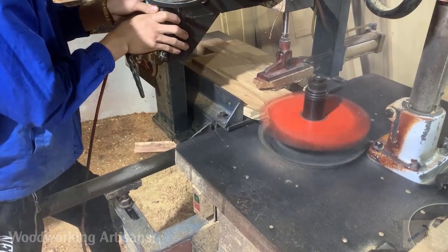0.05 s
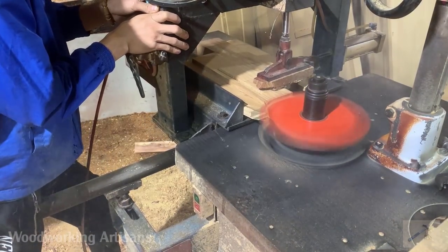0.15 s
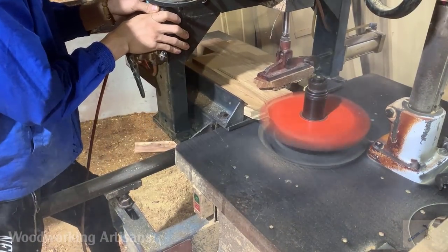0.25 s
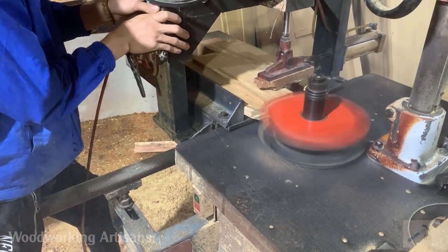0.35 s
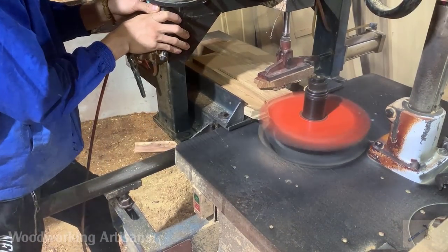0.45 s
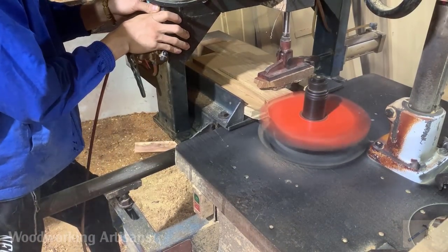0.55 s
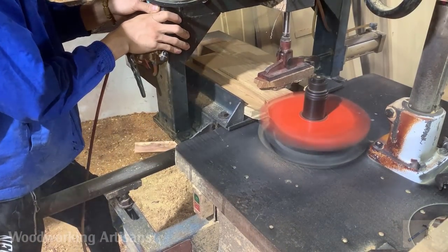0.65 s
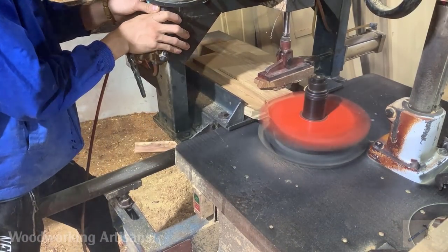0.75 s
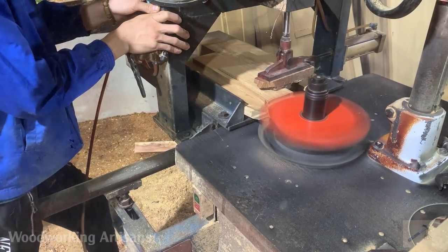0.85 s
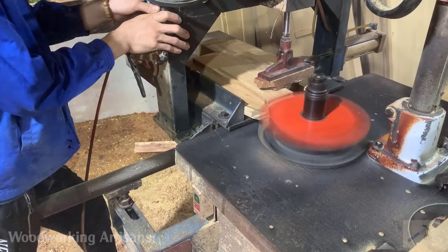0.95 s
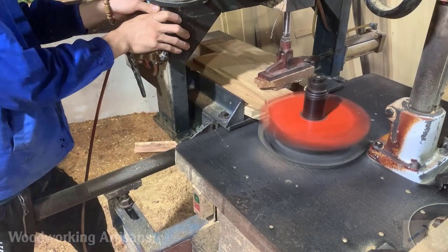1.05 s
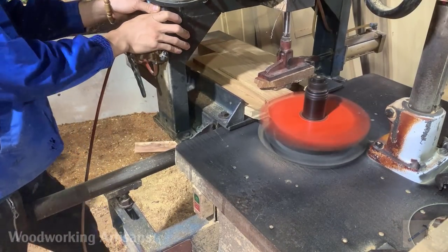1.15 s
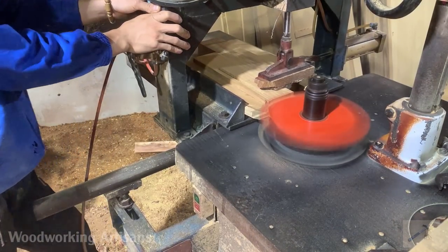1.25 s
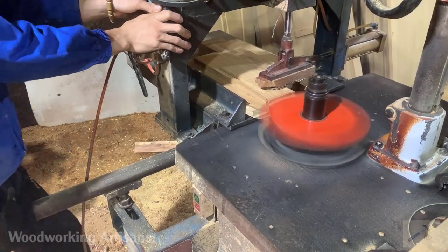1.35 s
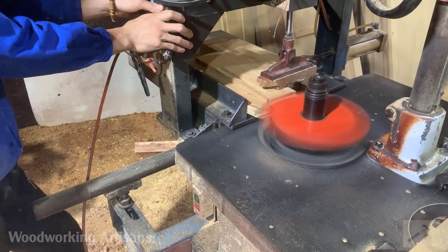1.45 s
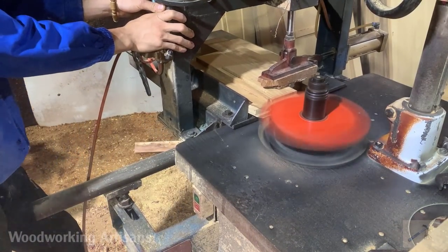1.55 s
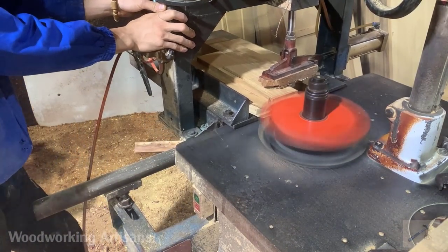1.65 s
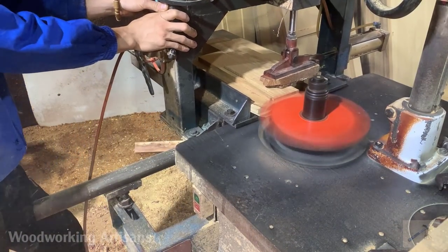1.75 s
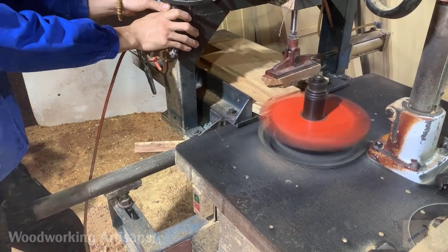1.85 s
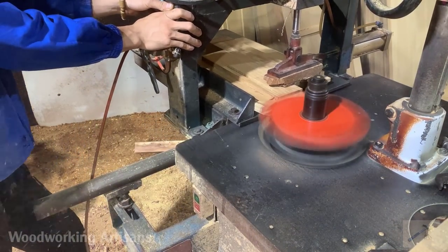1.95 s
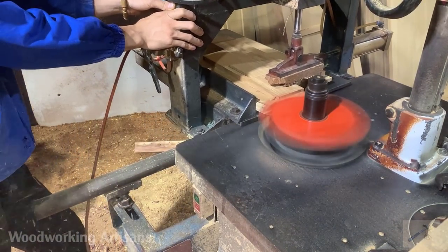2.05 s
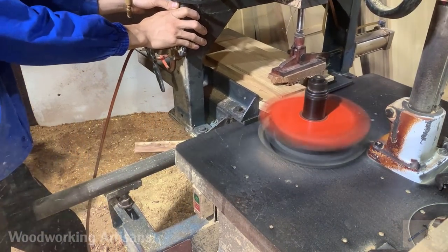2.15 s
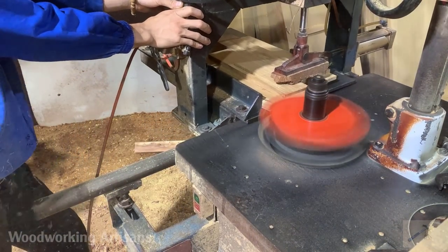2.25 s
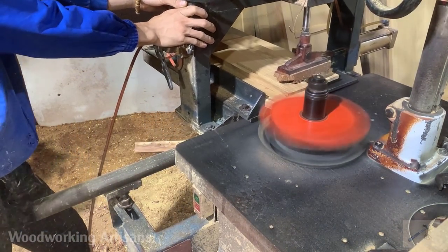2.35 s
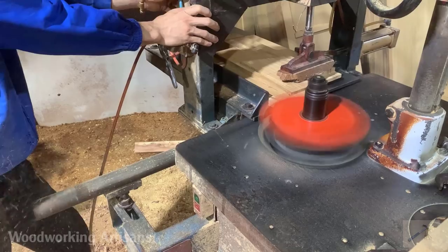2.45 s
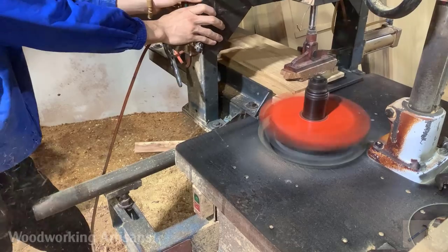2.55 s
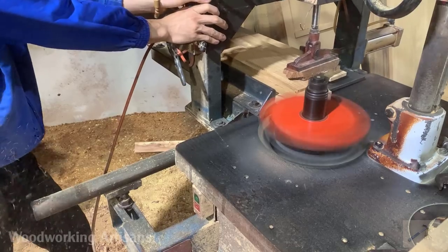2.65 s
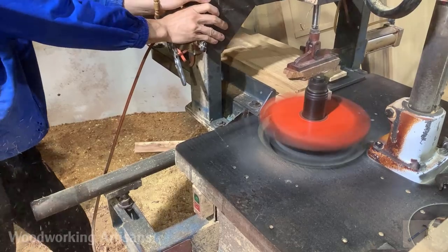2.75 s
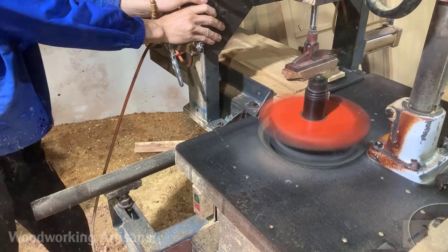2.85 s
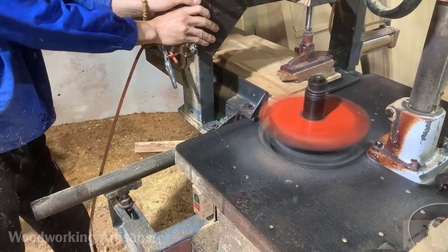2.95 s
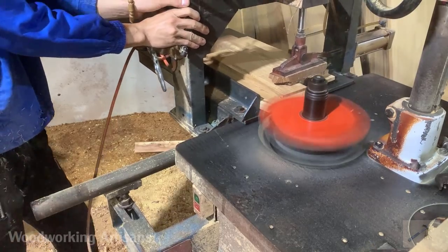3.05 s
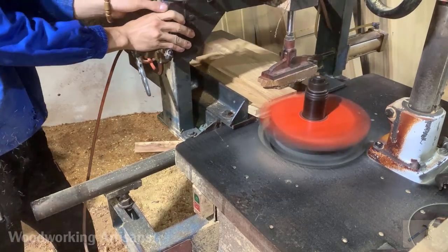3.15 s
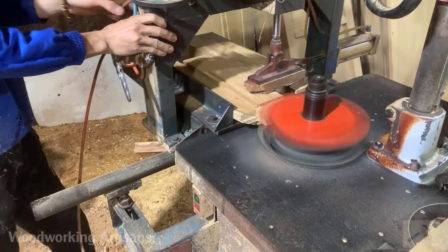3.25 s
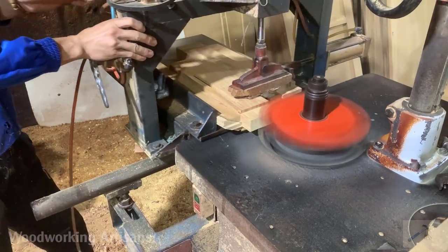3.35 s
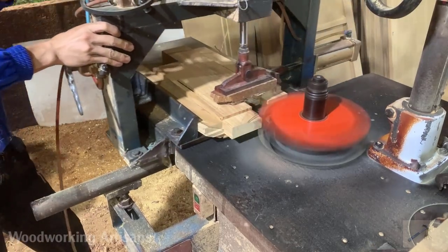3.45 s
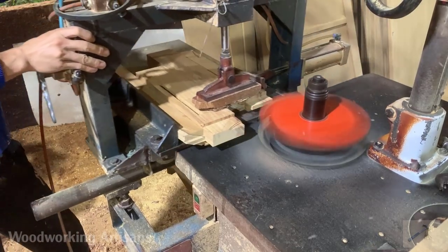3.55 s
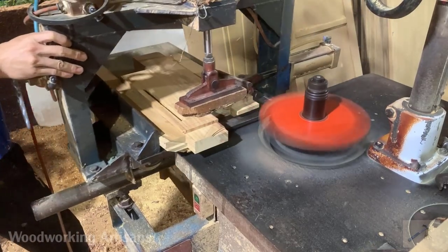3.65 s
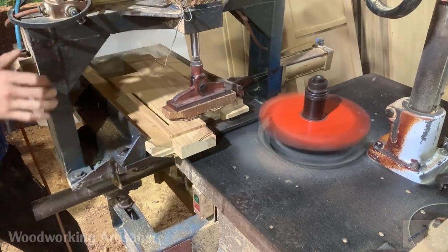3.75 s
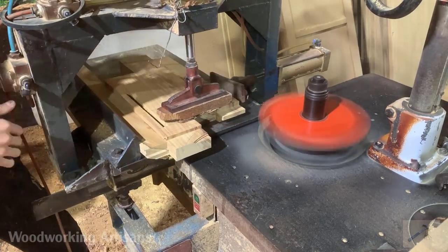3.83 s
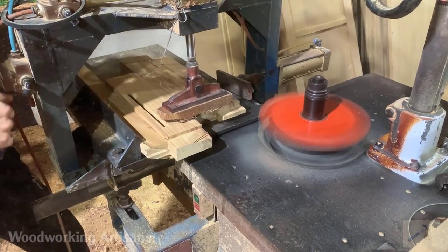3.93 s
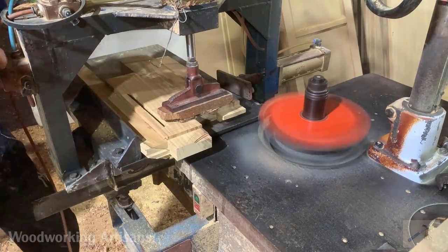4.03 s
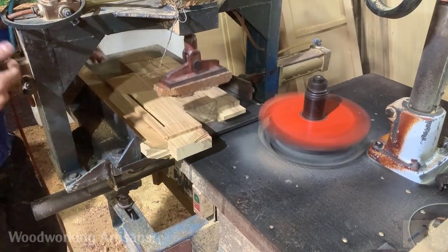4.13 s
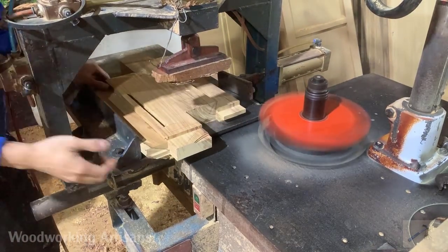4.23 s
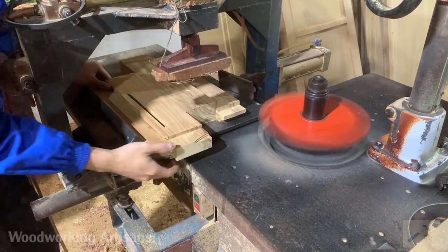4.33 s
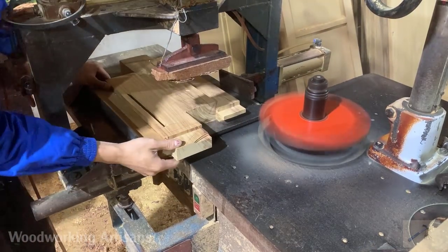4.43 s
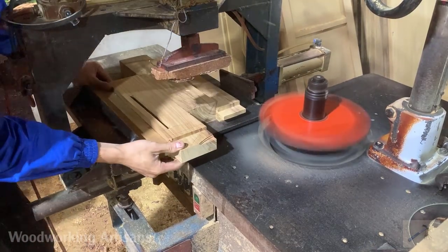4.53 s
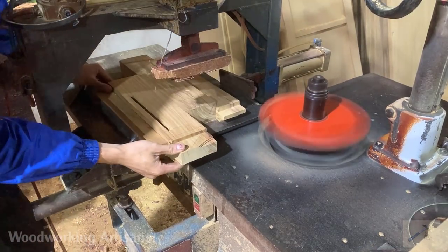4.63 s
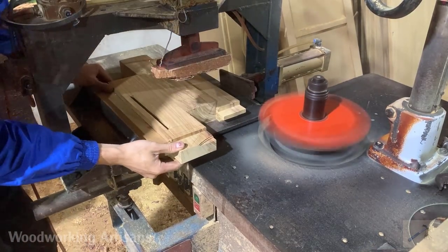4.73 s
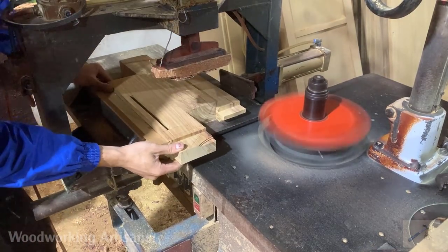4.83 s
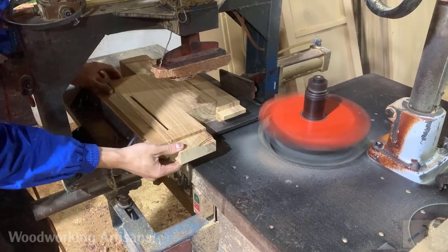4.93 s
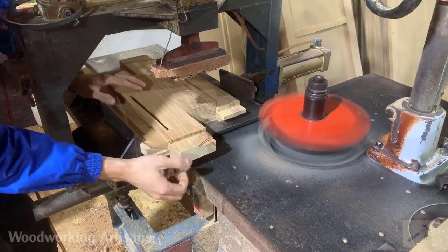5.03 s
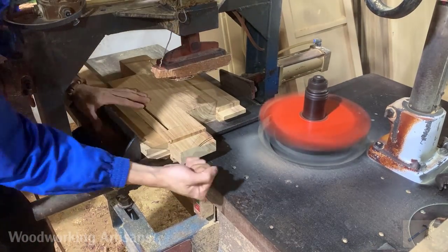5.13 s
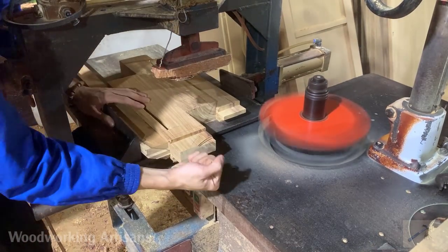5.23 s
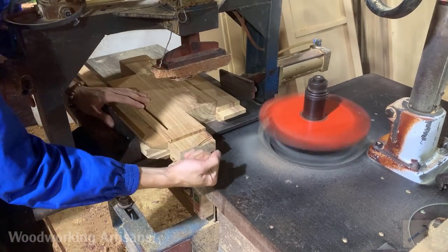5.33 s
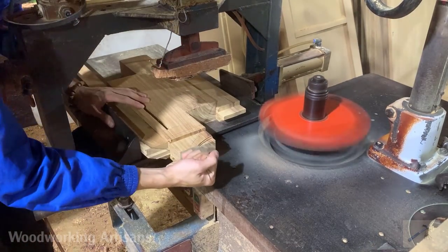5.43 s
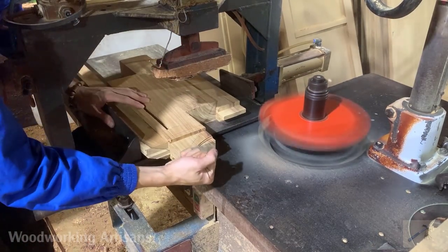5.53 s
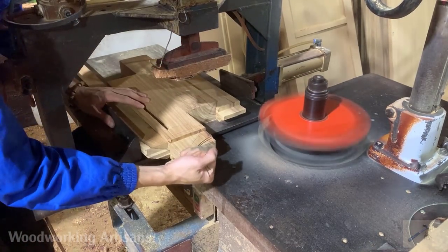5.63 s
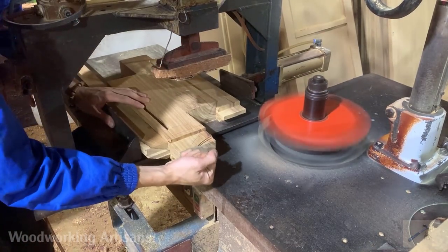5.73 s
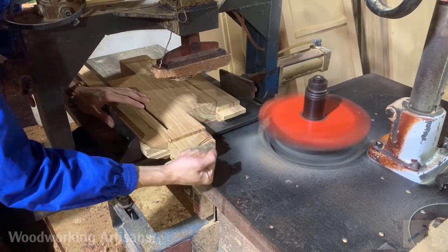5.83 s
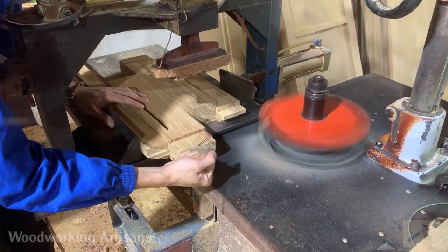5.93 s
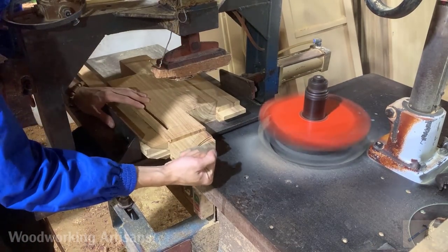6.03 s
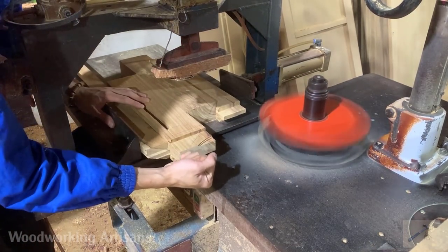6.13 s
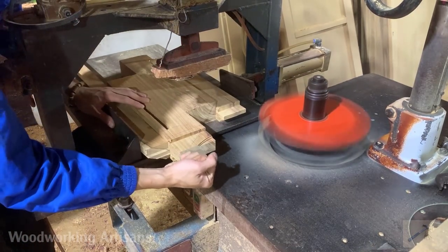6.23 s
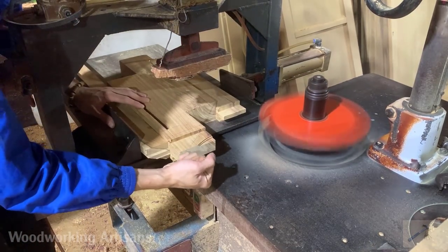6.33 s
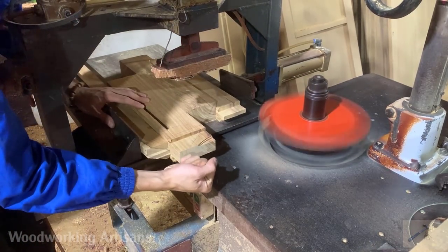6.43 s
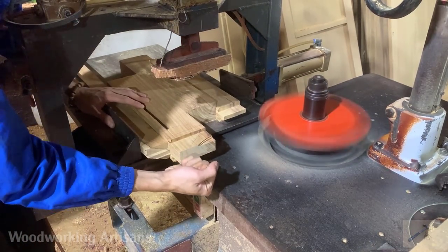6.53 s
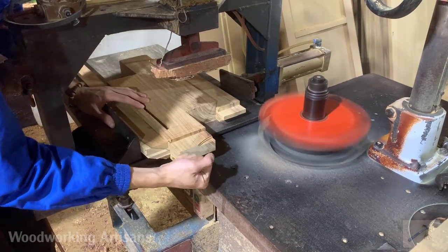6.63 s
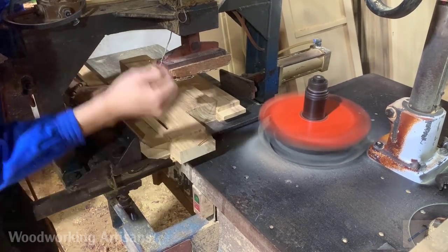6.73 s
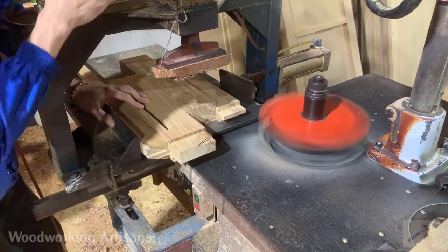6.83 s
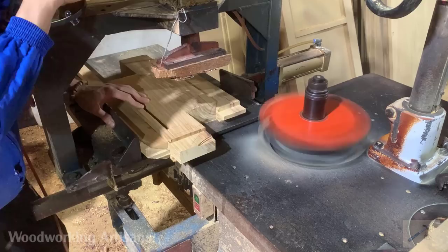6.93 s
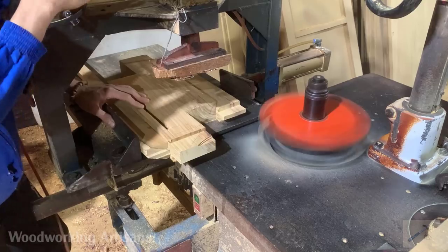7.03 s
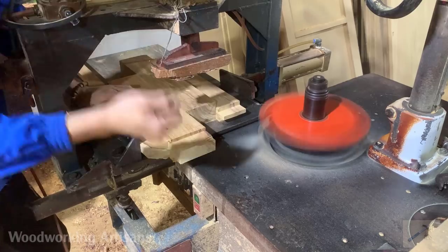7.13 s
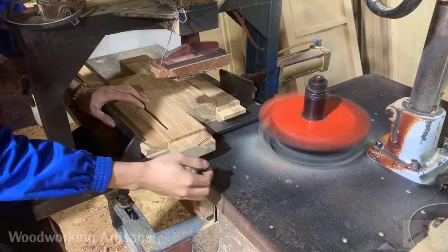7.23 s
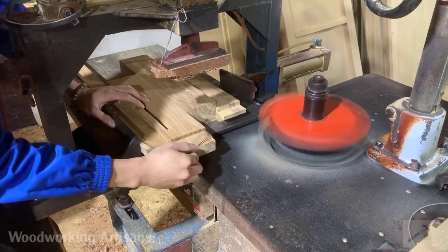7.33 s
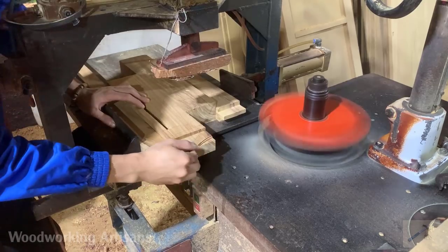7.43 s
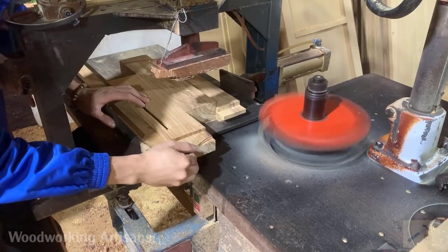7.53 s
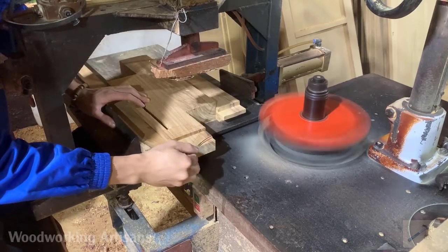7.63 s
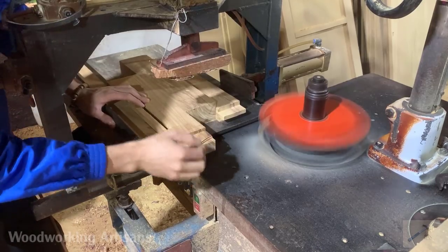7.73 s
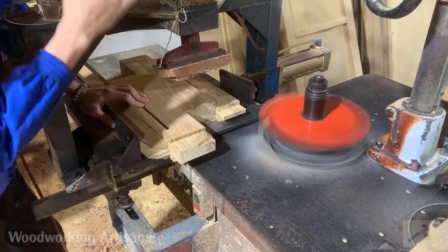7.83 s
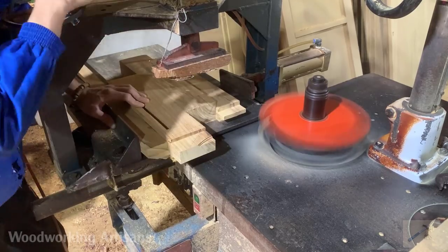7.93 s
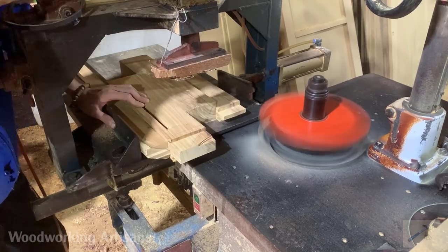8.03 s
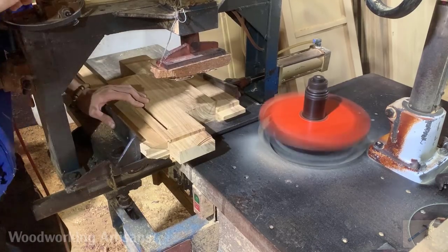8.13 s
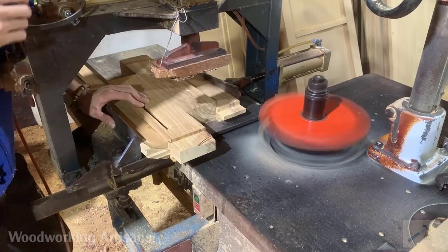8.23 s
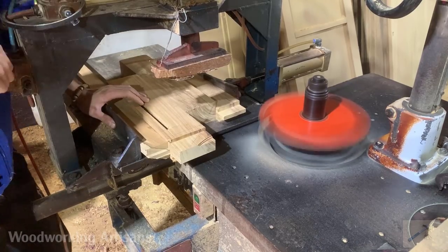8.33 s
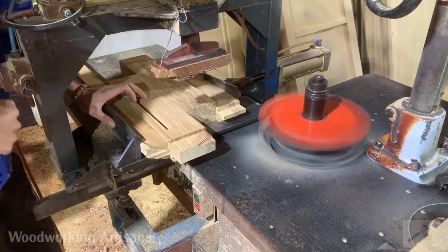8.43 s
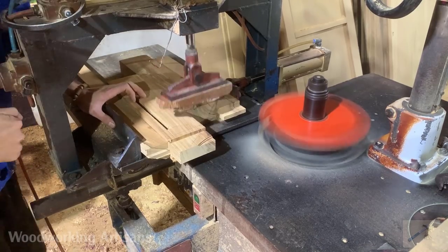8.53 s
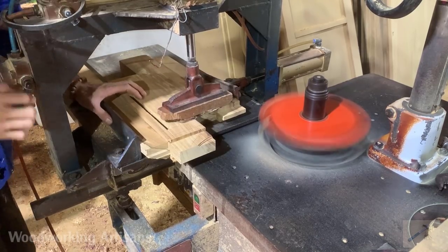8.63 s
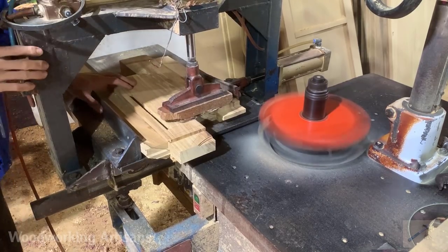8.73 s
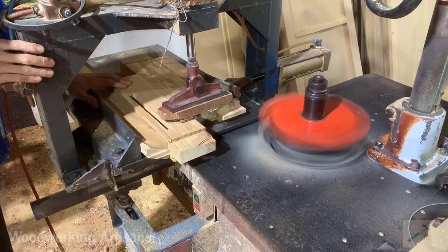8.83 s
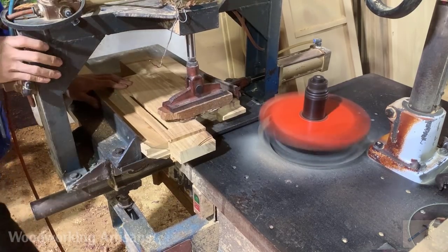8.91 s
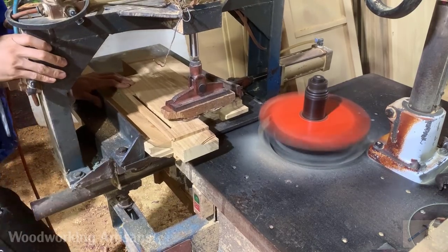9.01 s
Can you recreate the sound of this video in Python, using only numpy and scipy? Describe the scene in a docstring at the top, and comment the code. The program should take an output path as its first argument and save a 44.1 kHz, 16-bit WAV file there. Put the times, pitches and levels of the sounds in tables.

```python
"""A spindle moulder cuts a clamped board in a busy workshop, then idles while the board is turned.
The knives sing on multiples of the spindle speed and ring the cutter disc (sums of sines); chips hiss
(noise beating with the turn). An air clamp vents (shaped noise) and the board knocks (struck modes).
Behind it a far tool's thin whistle wanders (a gliding sine), over shop roar and rumble (coloured noise)
and motor hum and whine (wavering sines)."""
import sys
import numpy as np
from scipy import signal
from scipy.fft import rfft, irfft, next_fast_len
from scipy.io import wavfile
from scipy.ndimage import uniform_filter1d

SR = 44100
rng = np.random.default_rng(int(sys.argv[2]) if len(sys.argv) > 2 else 0)


def ratio(d):
    """dB to gain"""
    e = np.asarray(d, float) / 20
    return 10 ** e


def to_wav(sig):
    """Store sig (one row per channel, or 1-D mono) as 16-bit WAV at the path in sys.argv[1].

    Samples outside -1..1 are clipped; the rate is SR.
    """
    pcm = np.clip(np.atleast_2d(sig), -1, 1) * 32767
    pcm = np.round(pcm).astype(np.int16)
    wavfile.write(sys.argv[1], SR, pcm.T)  # frames by channels


N = 399987
TIME = np.arange(N) / SR


def rms_one(x):
    """Normalisation: scale a signal to unit rms."""
    return x / np.sqrt(np.mean(x ** 2) + 1e-20)


def in_time(rows, length=N):
    """Linear interpolation: columns of a curve table, one value a sample."""
    t, *columns = np.transpose(rows)
    return [np.interp(TIME[:length], t, column) for column in columns]


def at_hz(points, hz):
    """Logarithmic frequency scale: read a spectrum table between its points."""
    f, values = np.transpose(points)
    return np.interp(np.log(hz), np.log(f), values)


def drift(rate_hz, length=N):
    """Low-pass filtered noise: a slow random wander of rms 1, drawn once every 64 samples."""
    r = np.exp(-128 * np.pi * rate_hz / SR)
    coarse = rng.standard_normal(length // 64 + 1002)
    slow = signal.lfilter([1], [1, -2 * r, r * r], coarse)[1000:]  # leave out the filter's start
    return np.interp(np.arange(length) / 64, np.arange(len(slow)), rms_one(slow - slow.mean()))


def bursts(rows, length=N):
    """Exponential growth and decay: swells even in dB, of which the loudest rules."""
    levels_db = []
    for peak_s, rise_s, fall_s, db in rows:
        since = TIME[:length] - peak_s
        levels_db.append(db - 20 * np.maximum(-since / max(rise_s, .01), since / max(fall_s, .01)))
    return ratio(np.max(levels_db, axis=0))


def pair(phase, pan_db, lead):
    """Interchannel level and phase difference: one sine in two channels, rms 1 over both."""
    left, right = ratio(pan_db / 2), ratio(-pan_db / 2)
    channels = np.array([left * np.sin(phase + lead), right * np.sin(phase)])
    return 2 / np.sqrt(left ** 2 + right ** 2) * channels


# interchannel likeness of the noises, rooted and scaled in use: f/Hz, likeness [0-1]
LIKENESS = [(60, 1), (130, 0.84), (290, 1), (640, 0.9), (1410, 0.49), (3100, 0.03), (6820, 0.02),
            (15000, 0)]
# interchannel balance of the noises: f/Hz, left over right level/dB
LEANING = [(60, -7), (110, 0.5), (200, -5), (380, 0.5), (700, -1.5), (1290, -1.5), (2380, 0), (4400, 1),
           (8120, -2.5), (15000, -2.5)]


def coloured(spectrum, patchy_db, alike_share, alike_least=0, length=N):
    """Spectral shaping and partial coherence: flickering stereo noise of rms 1."""
    size = next_fast_len(length)
    hz = np.maximum(np.arange(size // 2 + 1) * SR / size, 1)
    mid, side = rfft(rng.standard_normal((2, size)))
    alike = alike_share * np.sqrt(np.clip(at_hz(LIKENESS, hz), 0, 1))
    alike = np.clip(alike, alike_least, .97)
    both = np.sqrt(1 + alike) * mid + np.sqrt(1 - alike) * side * [[1], [-1]]
    lean = ratio(at_hz(LEANING, hz) / 2 * np.array([[1], [-1]]))
    inside = (hz > spectrum[0][0]) & (hz < spectrum[-1][0])
    noise = irfft(both * lean * inside * ratio(at_hz(spectrum, hz)), size)[:, :length]
    return rms_one(noise * ratio(patchy_db * drift(15.7, length)))  # both channels flicker together


def motor_tone(hz, waver_db, blur):
    """Random modulation: a steady tone whose level, phase and side wander."""
    phase = 2 * np.pi * hz * TIME + blur * drift(2.9)
    return ratio(waver_db * drift(7.2)) * pair(phase, 1.0 * drift(0.46), 0.21 * drift(0.54))


# speed dips of the loaded spindle: t/s, speed lost [rpm], width [s]
SAGS = [(0, 26, .07), (.25, 18, .26), (1.54, 16, .17), (3.39, 16, .18)]


def sag(length):
    """Load torque: the spindle speed lost to the load, rpm."""
    return sum(lost * np.exp(-((TIME[:length] - t) / width) ** 2) for t, lost, width in SAGS)


def spindle_turn(length):
    """Integrated angular velocity: the spindle angle in rad, shaken a little by a slow random drift."""
    free_rpm = 6647
    steady = 2 * np.pi * np.cumsum((free_rpm - sag(length)) / 60) / SR
    return steady + .003 * drift(6, length)


# the cut: t/s, disc ring level/dB, its lower and upper mode level/dB re ring, chip load level/dB
CUT = [(0, -53, 10.5, -8, -46), (.2, -44, 2.5, -7, -55), (.35, -45, 4, -12, -43), (.5, -41, -2, -12, -50),
       (.97, -24.5, -6, -15, -42.5), (1.08, -22, -7.5, -17, -39), (1.27, -25.5, -10.5, -18, -47),
       (1.37, -28.5, -7, -15, -51), (1.45, -41, -1, -11, -53), (1.5, -40, -1, -14, -43),
       (1.535, -56, 14, 4, -44), (1.62, -58.5, 14, 0, -48), (1.72, -45.5, 1, -3, -40),
       (1.84, -41, -2, -1, -40), (1.94, -44, -2, -6, -45), (2.065, -28, -7.5, -6.5, -45),
       (2.16, -23.5, -9, -10.5, -38), (2.3, -26, -10, -9, -41), (2.4, -29.5, -3.5, -6, -45),
       (2.54, -28.5, -3.5, -10, -39), (2.8, -33, -5, -12, -47), (3.08, -43.5, -2, -11, -58),
       (3.17, -49, -7, -5, -47), (3.34, -47.5, 6, 0, -36.5), (3.44, -53, -6, -2, -49),
       (3.52, -50.5, -14, -24, -59), (3.75, -56, -14, -14, -69.5)]
# knives meeting wood: t/s, knife pass level/dB, its octave level/dB
KNIVES = [(0.0, -45, -46.5), (0.98, -41.5, -44.5), (1.45, -42, -52.5), (1.92, -39.5, -51.5),
          (2.37, -48.5, -52.5), (2.39, -48, -74), (2.47, -45, -75), (2.51, -49, -46.5), (2.98, -46.5, -47),
          (3.07, -50, -70), (3.12, -48, -51), (3.2, -38.5, -51), (3.35, -46, -34.5), (3.51, -44.5, -51),
          (3.57, -51, -75.5), (3.6, -65, -62), (3.7, -49, -75)]
# the comb of high multiples: t/s, level/dB
COMBS = [(0.0, -45), (0.11, -54), (0.34, -50), (0.4, -54), (0.5, -44), (1.02, -42), (1.07, -49),
         (1.29, -53), (1.39, -47), (1.46, -58), (1.49, -45), (1.61, -66), (1.83, -47), (1.85, -51),
         (2.17, -45), (2.2, -57), (2.26, -45), (2.82, -51), (2.85, -45), (2.95, -59), (3.1, -62),
         (3.13, -78), (3.17, -49), (3.35, -62), (3.62, -78), (3.7, -69)]
# screech setting in and breaking off as knives bite and skip: t/s, level/dB, top family level/dB re it
SCREECHES = [(0.0, -52, -9), (0.1, -51, 1), (0.26, -53, -2), (0.42, -54, 4), (0.55, -44, -4),
             (0.95, -37.5, 1), (1.05, -41.5, 7.5), (1.13, -58, 2), (1.34, -47, -4), (1.44, -55, -5),
             (1.5, -49, 7), (1.63, -57, 3), (1.81, -43.5, -2), (2.03, -50, 1), (2.08, -32.5, -0.5),
             (2.17, -37, -7), (2.21, -48, -3), (2.25, -42, -5), (2.33, -56, -3), (2.39, -35, -7),
             (2.42, -50, -3), (2.53, -54, -7), (2.55, -36, -8), (2.61, -48, -1), (2.66, -34, -8),
             (2.69, -47, -2), (2.74, -36, -6), (2.79, -55, -7), (2.87, -35.5, -6), (3.14, -50.5, -9),
             (3.16, -62, -3), (3.21, -49.5, 4), (3.39, -44, 1), (3.43, -49, 4.5), (3.65, -77, 2),
             (3.7, -79, -1)]


def cut_levels(length):
    """Forced vibration: levels of the eight families, of hiss and of rasp, all in dB."""
    screech_hiss_db, rasp_db = -15, -12  # hiss under the screech; rasp under the chip load
    flutter_s, flutter_width_s, flutter_hz, flutter_db = 2.6, 0.21, 16, 2
    ring_db, lower_db, upper_db, load_db = in_time(CUT, length)
    since = TIME[:length] - flutter_s
    # the lower mode flutters for a moment
    flutter = np.exp(-(since / flutter_width_s) ** 2) * np.cos(2 * np.pi * flutter_hz * since)
    lower_db = lower_db + flutter_db * flutter
    comb_db = in_time(COMBS, length)[0]
    screech_db, top_db = in_time(SCREECHES, length)
    disc_db = [ring_db + lower_db, ring_db, ring_db + upper_db]
    families_db = [*in_time(KNIVES, length), *disc_db, comb_db, screech_db, screech_db + top_db]
    # the powers of chip hiss and of the hiss dragged along by the screech add
    hiss_db = 10 * np.log10(ratio(2 * load_db) + ratio(2 * (screech_db + screech_hiss_db)))
    return families_db, hiss_db, load_db + rasp_db


# eight families: knife pass, octave, lower mode, ring, upper mode, comb, screech, top screech;
# in each: spindle multiple, level/dB re family, left over right level/dB, left phase lead [rad]
PARTIALS = [
    [(8, 0, -1, -.1), (24, -11, 0, -.1), (22, -14, -2, .1), (23, -16, -1, .3)],
    [(16, 0, 2, .2), (13, -15, -1, -.3), (14, -22, -2, .2), (64, -18, -2, 0), (72, -15, -2, -1)],
    [(32, 0, 2, -1.5), (30, -16, -1, -.3), (34, -11, 0, -1), (33, -24, 4, .3), (26, -26, 4, .3),
     (31, -24, 1, 0), (28, -23, 3, -.4)],
    [(38, 0, 0, .1), (36, -25, -4, -1.2), (37, -26, -3, -.4), (39, -25, -6, .1), (42, -34, -3, .3)],
    [(40, 0, -1, -.2), (45, -28, -2, 1.1), (49, -23, -1, .5), (47, -25, -1, 0), (41, -24, -1, 0),
     (46, -12, -2, .5), (48, -20, -1, .8), (54, -18, -1, 1.4), (56, -21, 0, 1), (68, -18, -2, .7),
     (69, -15, -2, -.2), (70, -17, -2, .4), (53, -22, 1, -2.1)],
    [(74, -1, -3, -.4), (78, 0, -1, -.7), (82, 0, -5, .2), (86, 1, -1, -.6), (75, -16, -3, 1.6),
     (83, -13, -4, .3), (73, -15, -3, .5), (85, -15, -2, 1), (77, -9, 0, 2.2), (79, -11, -1, .2),
     (80, -17, -1, 1.3), (71, -14, -5, 1.7), (72, -17, 0, -1)],
    [(88, 1, -8, -.7), (87, -21, -4, -.5), (140, -15, 1, -1.3)],
    [(94, 2, -12, 1), (102, 0, -12, 2.9), (103, -16, -6, -2), (96, -6, -5, 1.3), (101, -17, -7, -2.4),
     (104, -15, -4, -2.9), (112, -21, -4, .3)],
]
# one knife bites deeper for a while: spindle multiple to level change/dB
SECOND_BITE = {37: 10, 39: 2, 33: 5, 24: 9, 48: 5, 46: 3, 45: 12, 49: -5, 36: -3, 30: -3, 34: -6, 53: 3, 78:
               -4, 86: -4}


def partials(turn, levels_db, pan_db):
    """Harmonic series: spindle multiples; weak ones waver more, each at random."""
    length = len(turn)
    time = TIME[:length]
    exit_s, exit_width_s, exit_rougher = 3.34, .1, 8  # the screech blurs as the knives leave the board
    bite_s, bite_eases_s = 1.97, 3.05  # between these times the ring buzzes once a turn
    screech_sharp = 1.0007  # the two screech families sit slightly above the exact multiples
    rough = 1 + exit_rougher * np.exp(-((time - exit_s) / exit_width_s) ** 2)
    deeper = np.clip(np.minimum(time - bite_s, bite_eases_s - time) / .1, 0, 1)
    screech_turn = screech_sharp * turn + .0016 * rough * drift(70, length)
    out = 0
    for family, level_db in zip(PARTIALS, levels_db):
        angle = screech_turn if family in PARTIALS[-2:] else turn
        for multiple, db, lean_db, lead in family:
            waver_db = (.7 if db > -5 else 2.5) * drift(4, length)
            if family in PARTIALS[5:]:  # the high families flutter
                waver_db = waver_db + 1.5 * drift(16, length)
            waver_db = waver_db + deeper * SECOND_BITE.get(multiple, 0)
            if family is PARTIALS[3]:  # the ring moves with the board
                lean_db = lean_db + pan_db
            phase = multiple * angle + rng.uniform(0, 2 * np.pi)
            out = out + ratio(level_db + db + waver_db) * pair(phase, lean_db, lead)
    return out


def groan(turn):
    """Load-dependent excitation: the third multiple grows with lost speed, dies as the board slides off."""
    level_db, db_per_rpm, ends_s, fade_s = -61, 0.52, 3.24, .1
    engaged = np.clip(1 - (TIME[:len(turn)] - ends_s) / fade_s, 0, 1)
    level = ratio(level_db + db_per_rpm * np.minimum(sag(len(turn)), 18))
    return level * engaged * pair(3 * turn, 1, -.2)


# other spindle multiples: multiple, level/dB, left over right level/dB, left phase lead [rad]
OTHER_PARTIALS = [(93, 0, -9, -.9), (101, -15, -7, -2.4), (95, -16, -6, 1), (103, -15, -6, -2),
                  (83, -15, -4, .3), (50, -14, 0, .5)]
# their swells: peak t/s, time to rise 20 dB [s], time to fall 20 dB [s] (at least .01), level/dB
OTHER_SWELLS = [(.05, 3, 6, -47), (.46, 1, .12, -42.5), (1.52, 0.1, 0.3, -39.5), (3.3, -5, 0, -55)]


def other_multiples(turn):
    """Additive synthesis: other spindle multiples sound faintly through the cut, swell early and near 1.5 s."""
    tones = 0
    for multiple, db, lean_db, lead in OTHER_PARTIALS:
        waver_db = 2.0 * drift(9.4, len(turn))
        tones = tones + ratio(db + waver_db) * pair(multiple * turn, lean_db, lead)
    return bursts(OTHER_SWELLS, len(turn)) * tones


# squeaks: peak t/s, time to rise 20 dB [s], time to fall 20 dB [s] (at least .01), level/dB
SQUEAKS = [(.13, .3, 1.5, -49), (.46, .5, -0.3, -39), (1.5, 0.1, 0.2, -45)]


def squeak(turn):
    """Single-harmonic excitation: the 109th spindle multiple swells and dies."""
    return bursts(SQUEAKS, len(turn)) * pair(109 * turn, -1, .1)


# side of the ring as the board moves: t/s, left over right level/dB
RING_SIDE = [(0, 9), (.4, 2.5), (1.4, 4.5), (1.65, -1), (2.1, 1.5), (3.0, 9), (3.75, 2)]


def cutter(turn, levels_db):
    """Superposition: all tones that follow the spindle add up."""
    pan_db = in_time(RING_SIDE, len(turn))[0]
    return partials(turn, levels_db, pan_db) + groan(turn) + other_multiples(turn) + squeak(turn)


# hiss of chips torn from the board: f/Hz, density level/dB
CHIP_COLOUR = [(1500, -17), (3000, 3), (5500, -8), (8000, -1.5), (10000, -1.5), (12000, -3), (14500, -6),
               (16000, 1)]
# disc resonances the chips rasp in: f/Hz, bandwidth [Hz], level/dB
RASP = [(3500, 600, 0), (4150, 600, 0)]


def chips(turn, hiss_db, rasp_db):
    """Amplitude modulation: hiss and resonant rasp beat once and twice a spindle turn."""
    beat = 1 + 0.23 * np.cos(2 * turn) + 0.49 * np.cos(turn)
    white, rasp = rng.standard_normal(len(turn)), 0
    for hz, width_hz, db in RASP:
        r, w = np.exp(-np.pi * width_hz / SR), 2 * np.pi * hz / SR
        rasp = rasp + ratio(db) * signal.lfilter([1, 0, -1], [1, -2 * r * np.cos(w), r * r], white)
    hiss = coloured(CHIP_COLOUR, patchy_db=1.2, alike_share=1.5, length=len(turn))
    return beat * (ratio(hiss_db) * hiss + ratio(rasp_db) * rms_one(rasp))


def cut():
    """Tool engagement: tones and chips fade out as the board leaves the knives."""
    length = int(CUT[-1][0] * SR)
    levels_db, hiss_db, rasp_db = cut_levels(length)
    turn = spindle_turn(length)
    fade = np.minimum((length - np.arange(length)) / (.1 * SR), 1)
    return fade * (cutter(turn, levels_db) + chips(turn, hiss_db, rasp_db))


# puffs of the air clamp: t/s, peak level/dB, rise time constant [s], t60 [s]
PUFFS = [(3.785, -39, .006, 0.11), (3.826, -29, 0.0028, 0.26), (3.99, -33.5, .003, .05),
         (4.058, -29, 0.0053, 0.31), (8.04, -31, .006, .06), (8.45, -22, 0.0059, 0.065),
         (8.499, -23, .002, .02), (8.505, -27, 0.002, 0.041)]
# long breath of the valve: t/s, level/dB
VENT = [(8.49, -80), (8.505, -29), (8.6, -32.5), (8.63, -36), (8.66, -64)]
# colour of the vented air: f/Hz, density level/dB
AIR = [(3000, -11), (5500, -8.5), (7500, 1), (9000, -5.5), (11500, -7), (13500, 1.5), (16000, 3.5)]


def clamp():
    """Jet noise: short puffs and one long vent of bright air."""
    envelope = ratio(in_time(VENT)[0])
    for t, db, rise_s, t60 in PUFFS:
        since = TIME - t
        rise = np.exp(np.minimum(since, 0) / rise_s)
        decay = ratio(-60 * np.maximum(since, 0) / t60)
        envelope += ratio(db) * np.where(since < 0, rise, decay)
    return envelope * coloured(AIR, patchy_db=1.0, alike_share=1.0, alike_least=.75)


# board and clamp pad on the carriage: t/s, relative level/dB, tilt [dB per octave, also added to the crack]
KNOCKS = [(8.124, -20, 0), (8.1312, -11, -.5), (8.1445, -19, -1), (8.2, -22, -3), (8.364, -22, -4),
          (8.622, -20, -2.5)]
# modes of the board: f/Hz, relative level/dB, t60 [s]
BOARD = [(420, -9, .04), (910, -1, .04), (1600, -5, .025), (2400, 3, .016), (3500, -5, .014),
         (4500, -1, .012), (6200, -7, .01)]


def knocks():
    """Impact excitation: a short noise crack plus quick contacts that strike the board's modes."""
    modes = np.zeros(N)
    spread = rng.uniform(.5, 1.5, (len(KNOCKS), len(BOARD)))
    for k, (hz, db, t60) in enumerate(BOARD):
        clicks = np.full(N, 1e-18)
        for (t, level_db, tilt_db), late in zip(KNOCKS, spread):
            contact_s = t + late[k] * (.001 + 1.5 / hz)  # low modes tend to be struck later
            tilted_db = level_db + db + tilt_db * np.log2(hz / 900)
            clicks[int(contact_s * SR)] = ratio(tilted_db - 14)
        r, w = ratio(-60 / (t60 * SR)), 2 * np.pi * hz / SR
        modes += signal.lfilter([1, 0, -1], [1, -2 * r * np.cos(w), r * r], clicks)
    burst = 0
    for t, level_db, tilt_db in KNOCKS:
        decay_db = -60 * np.maximum(TIME - t, 0) / .035
        burst = burst + ratio(level_db + tilt_db + decay_db) * (TIME > t)
    band = signal.butter(4, [300, 5000], "band", fs=SR, output="sos")
    return modes + ratio(-3) * signal.sosfilt(band, burst * rng.standard_normal(N))


# turning points of the far whistle: t/s, f/Hz, relative level/dB, relative octave level/dB
WHISTLE = [(1.38, 5300, -72, -80), (1.5, 5550, -54, -70), (1.57, 5730, -52, -70), (1.65, 6250, -56, -72),
           (1.78, 6500, -75, -80), (3.03, 7900, -75, -81), (3.25, 6230, -48, -64), (3.5, 5170, -49, -70),
           (3.65, 5760, -61, -71), (3.77, 6100, -56, -60.5), (3.9, 7000, -54, -68), (4.05, 7000, -58, -70),
           (4.15, 6570, -48, -60.5), (4.32, 6150, -49, -64), (4.42, 7600, -62, -76), (4.51, 8200, -60, -76),
           (4.6, 7600, -55, -70.5), (4.68, 6500, -50, -56), (4.77, 6050, -51, -53), (4.92, 5640, -59, -56),
           (5.0, 5450, -54, -61), (5.08, 5280, -44, -64), (5.17, 5600, -55, -59), (5.26, 6350, -55.5, -57),
           (5.36, 7340, -51, -68), (5.46, 6950, -46, -66), (5.55, 6450, -48, -66), (5.66, 6950, -47, -66),
           (5.8, 6550, -49, -60), (5.93, 6030, -47, -47), (6.02, 6500, -44, -55), (6.14, 7400, -50, -60),
           (6.23, 6400, -44, -52), (6.33, 5370, -54, -50), (6.44, 7500, -50, -70), (6.59, 7800, -52, -72),
           (6.7, 6480, -47, -54), (6.8, 6230, -43, -48), (6.9, 7600, -40, -67), (7.0, 8170, -47, -70),
           (7.08, 7300, -45, -58), (7.16, 6650, -43, -52), (7.33, 5980, -43, -54), (7.44, 6500, -45, -59),
           (7.58, 7440, -48, -70), (7.8, 8740, -53, -72), (7.95, 7800, -52, -74), (8.15, 8900, -49, -80),
           (8.45, 8440, -70, -80)]


def whistle():
    """Frequency modulation: a thin, unsteady, breathy tone and its octave, with rounded glides."""
    loss_db_per_khz_s = .7  # it thins out while its pitch climbs
    hz, tone_db, octave_db = in_time(WHISTLE)
    hz = uniform_filter1d(uniform_filter1d(hz, size=2000), size=2000)
    phase = 2 * np.pi * np.cumsum(hz * (1 + .011 * drift(80))) / SR
    climb = np.clip(np.gradient(hz) * SR / 1000, 0, 8)  # kHz per s
    level = ratio(3.5 * drift(18) - 1.0 - loss_db_per_khz_s * climb)
    tone = ratio(tone_db) * pair(phase, 1.2, 0.46)
    octave = ratio(octave_db) * pair(2 * phase, -1.5, .4)
    return level * (tone + octave)


# main line of the high whine, wavering: t/s, level/dB
WAVER = [(0.0, -51), (1.19, -55), (1.54, -45), (1.59, -52), (2.19, -57), (2.5, -43), (3.64, -61),
         (3.81, -45), (4.37, -47), (4.75, -54), (4.83, -47), (5.18, -44), (5.38, -56), (5.53, -45),
         (5.78, -51), (5.83, -44), (6.54, -49), (7.07, -37), (7.63, -43.5), (7.88, -35), (8.31, -50),
         (8.34, -56), (8.44, -38), (8.59, -61), (8.77, -45), (9.07, -42)]
# low whine: f/Hz, level/dB re whine
LOW_WHINE = [(2251.5, 0), (2347.5, -5), (2444, -8), (2153, -6)]
# high whine, main line first, then sidebands a motor turn apart: f/Hz, level/dB re its own curve
HIGH_WHINE = [(3019, 0), (2971.5, -9), (3067, -11), (3114.5, -11)]


def whines(swing_db):
    """Tonal sidebands: two motor whines, each a main line among neighbours."""
    low_db, sideband_db = -61.5 + 1.41 * swing_db, -54 + 1.18 * swing_db
    main_db = in_time(WAVER)[0]
    out = 0
    for lines, level_db in ((LOW_WHINE, low_db), (HIGH_WHINE[:1], main_db), (HIGH_WHINE[1:], sideband_db)):
        for hz, db in lines:
            out = out + ratio(level_db + db) * motor_tone(hz, waver_db=1.6, blur=0.39)
    return out


# close tones of the hum: f/Hz, level/dB re hum
HUM = [(200.3, 0), (185.6, -4), (211.3, -3), (170, -11), (100.2, -15)]


def hum(swing_db):
    """Beats: close low tones interfere, and together swell and sink."""
    throb_s, crest_s, throb_db = 1.48, 6.1, 2
    throb = throb_db * np.cos(2 * np.pi * (TIME - crest_s) / throb_s)
    hum_db = -59 + 1.21 * swing_db + throb
    return sum(ratio(hum_db + db) * motor_tone(hz, waver_db=1.0, blur=.1) for hz, db in HUM)


# carriage frame as it runs back: f/Hz, peak t/s, times to rise and fall 20 dB [s, at least .01], level/dB
FRAME_DRONES = [(213, 3.52, 1, 1.5, -48), (165.5, 3.53, -0.5, -0.5, -42), (89, 3.37, 0, 0, -54)]


def frame_drones():
    """Structural resonance: the carriage frame drones as it runs back."""
    return sum(bursts([swell]) * motor_tone(hz, waver_db=2.0, blur=0.54) for hz, *swell in FRAME_DRONES)


# colour of the rumble: f/Hz, density level/dB
RUMBLE = [(25, -34), (45, -31), (65, -17), (95, -3), (130, -3), (170, 0), (215, 0), (250, -4), (280, -9)]
# carriage running back, board shifted: peak t/s, time to rise 20 dB [s], to fall 20 dB [s], level/dB
CARRIAGE = [(3.26, .15, 1.5, -50), (5.5, 1.3, 1.3, -52), (6.9, 1, .6, -52)]


def rumble(swing_db):
    """Rolling noise: low noise of the shop, with swells from the carriage."""
    level = ratio(-64 + 1.5 * swing_db) + bursts(CARRIAGE)
    return level * coloured(RUMBLE, patchy_db=.8, alike_share=.95)


# colour of the roar: f/Hz, density level/dB
ROAR = [(120, -51), (200, -1.5), (236, -12), (373, -9.5), (409, -9), (867, -5.5), (1120, -6.5),
        (2330, -6.5), (2800, -7.5), (3070, -5.5), (3430, -8.5), (6640, -12.5), (15100, -21.5), (16000, -13)]
# faint motor tones: f/Hz, level/dB re roar, waver [dB]
MOTORS = [(300.5, -24, 3), (372, -23, 3), (2681, -25, 3), (3740, -29, 2), (6851, -28, 3)]


def roar(swing_db):
    """Broadband noise with tones: shop roar, its motors, and the idling knives passing in free air."""
    roar_db, idle_hz, idle_db = -42, 889, -16.5  # idle level is over the roar
    tones = sum(ratio(db) * motor_tone(hz, waver_db, blur=0.82) for hz, db, waver_db in MOTORS)
    idling = np.clip((TIME - 3.55) / 0.1, 0, 1)
    tones = tones + idling * ratio(idle_db) * motor_tone(idle_hz, waver_db=1.5, blur=0.27)
    return ratio(roar_db + swing_db) * (coloured(ROAR, patchy_db=0.91, alike_share=0.97) + tones)


# shop level, lower during the cut and the vent: t/s, level offset/dB
DIP = [(0, 1.5), (3.0, 2), (3.6, 2), (8.503, 3), (8.515, -4), (8.6, -4), (8.655, -4.5), (8.71, 1),
       (8.76, 2.3), (9.07, 1.5)]


def shop():
    """Ambient noise: it creeps up, swells ever faster after the cut and dips while the clamp vents."""
    creep_db_per_s, swell_db_per_s2, swell_from_s, swell_to_s = 0.2969, 0.4521, 3.91, 7.93
    ramp_s = np.clip(TIME, swell_from_s, swell_to_s) - swell_from_s
    swing_db = creep_db_per_s * np.minimum(TIME, swell_to_s) + swell_db_per_s2 * ramp_s ** 2
    swing_db = swing_db + in_time(DIP)[0]
    return whines(swing_db) + hum(swing_db) + frame_drones() + rumble(swing_db) + roar(swing_db)


def scene():
    """Superposition: the cut comes first, and the other sources go on after it."""
    out = clamp() + knocks() + whistle() + shop()
    cutting = cut()
    out[:, :cutting.shape[1]] += cutting
    return out


def low_pass(x):
    """Removes everything above the highest recorded frequency."""
    return signal.sosfilt(signal.butter(12, 15680, fs=SR, output="sos"), x)


def record(dry):
    """Signal chain: the finished stereo mix goes to its last stage."""
    return low_pass(dry)


dry = scene()
out = record(dry)
to_wav(out)
```